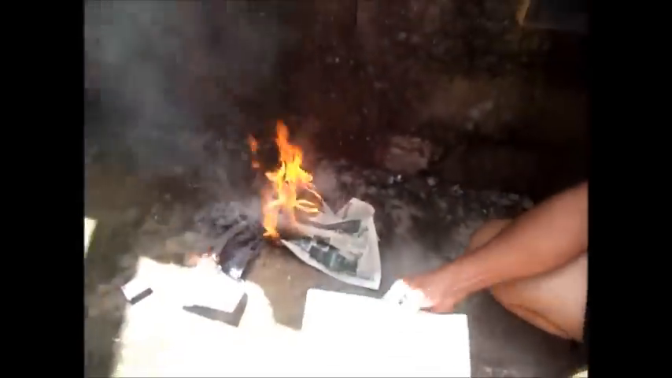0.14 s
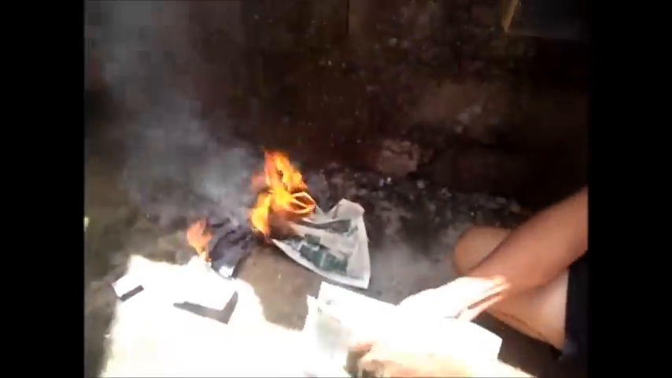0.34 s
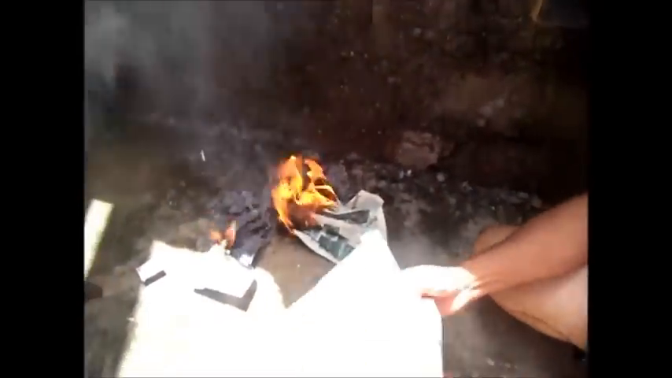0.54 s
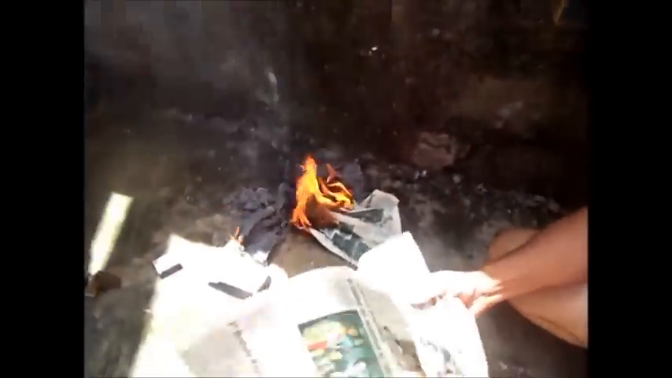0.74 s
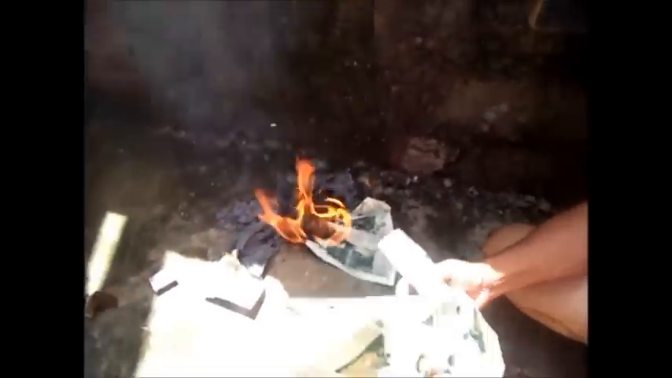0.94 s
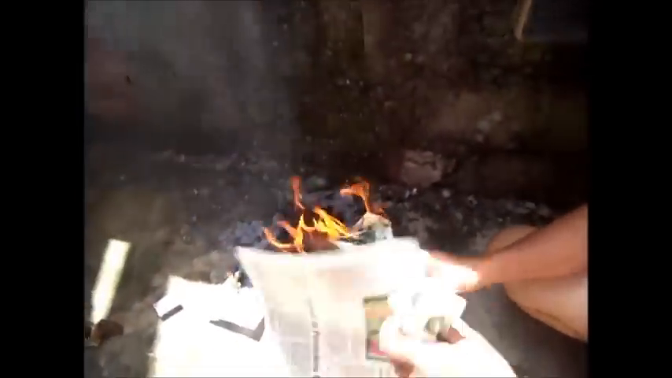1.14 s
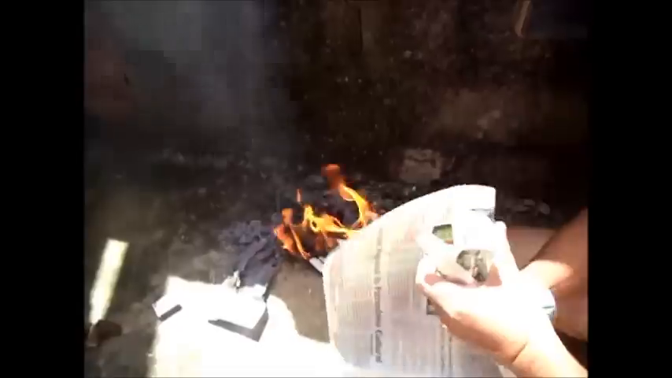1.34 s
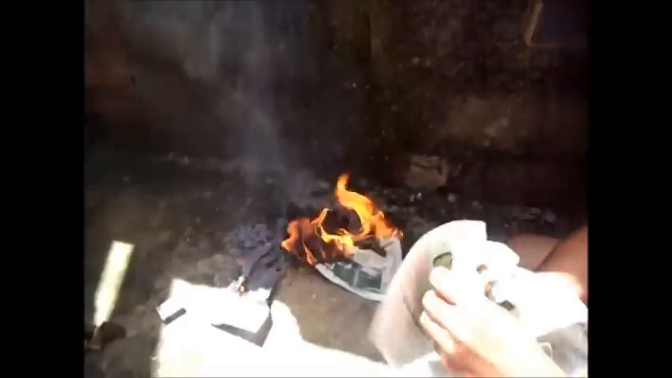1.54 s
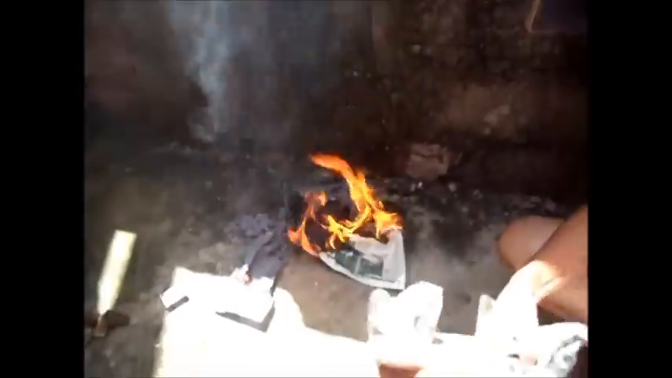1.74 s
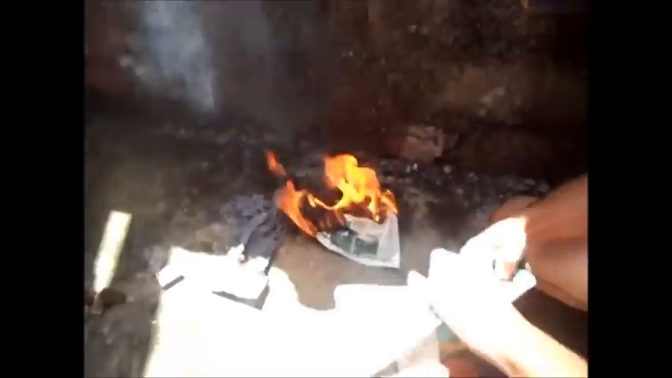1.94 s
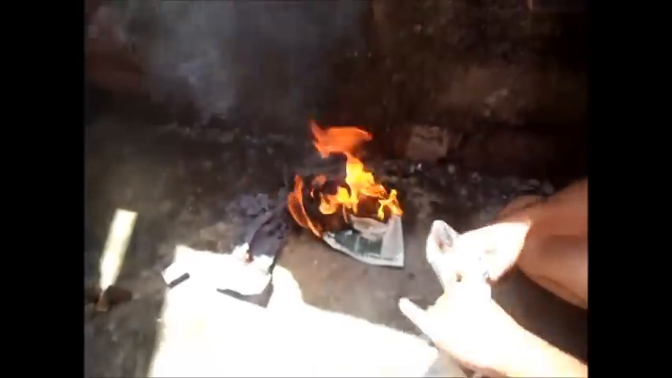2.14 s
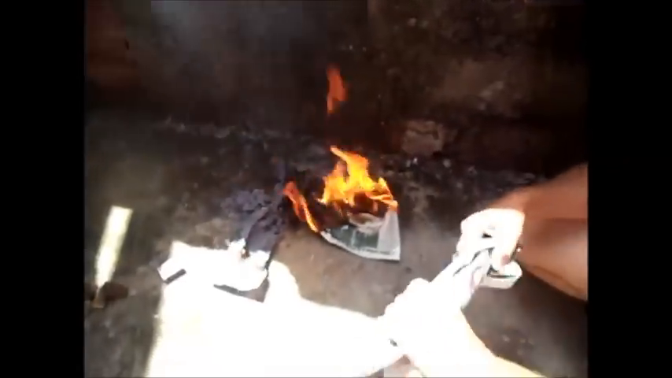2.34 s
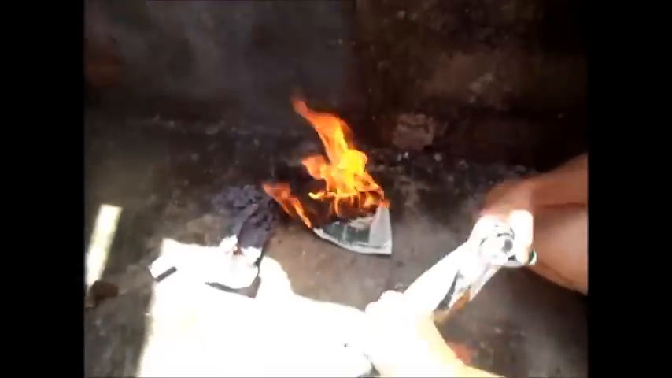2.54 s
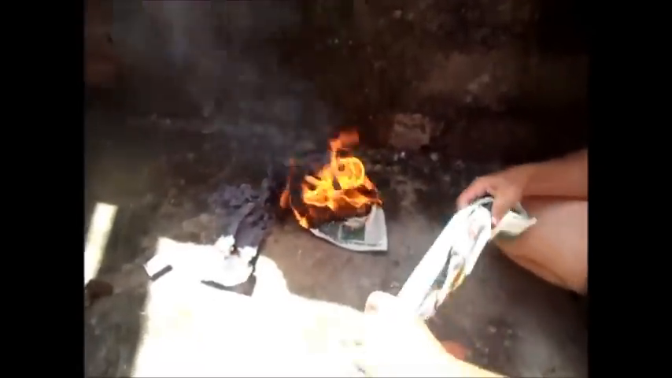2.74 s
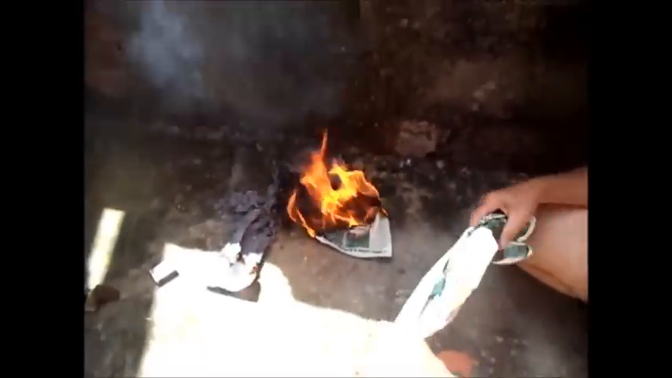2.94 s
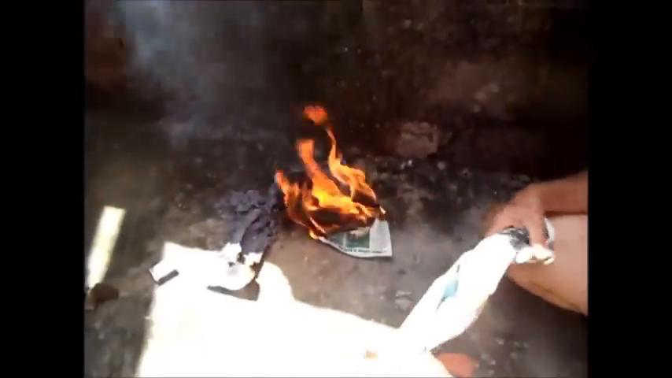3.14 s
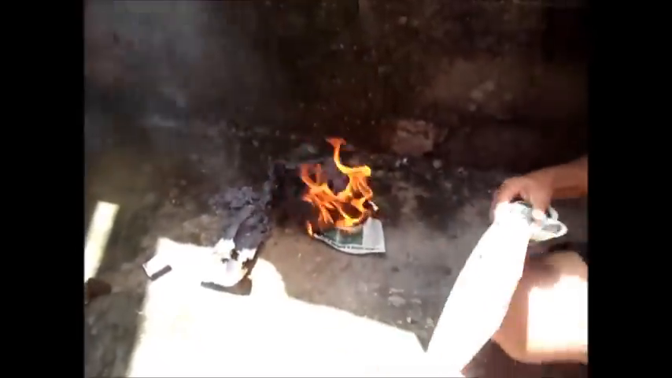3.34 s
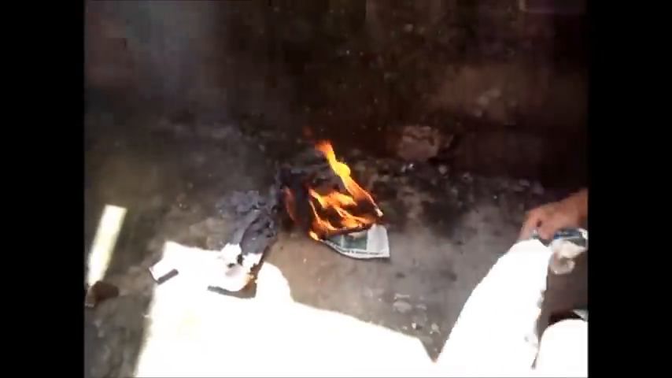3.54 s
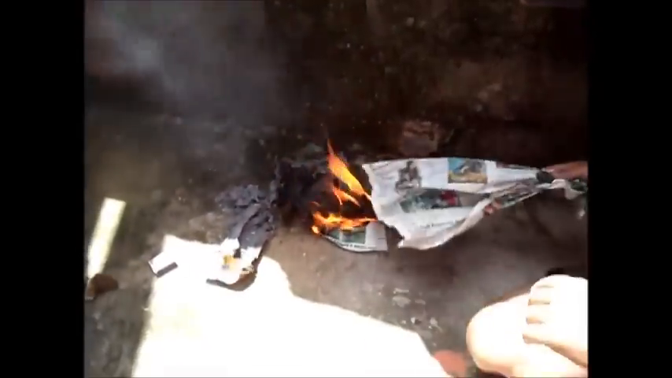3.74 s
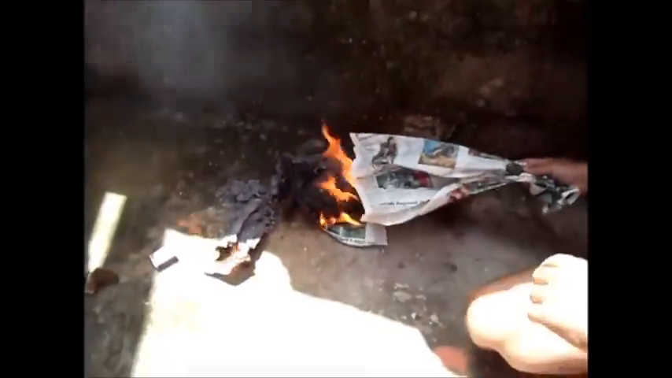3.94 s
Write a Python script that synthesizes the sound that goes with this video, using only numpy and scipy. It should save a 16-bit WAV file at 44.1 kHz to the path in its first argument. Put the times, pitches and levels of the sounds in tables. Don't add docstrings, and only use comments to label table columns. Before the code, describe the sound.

Close to a small camera outdoors, hands lift newspaper with sharp crackles, ball it with scrapes and soft thumps, then twist it in dense rustling that thins out, over faint hum, airy fire flutter and distant engine.

```python
import sys
import numpy as np
from scipy import signal
from scipy.fft import rfft, irfft, next_fast_len
from scipy.io import wavfile
from scipy.ndimage import uniform_filter1d, map_coordinates

SR = 44100
rng = np.random.default_rng(int(sys.argv[2]) if len(sys.argv) > 2 else 0)


def gain_from_decibels(decibels):
    exponent = np.asarray(decibels, float) / 20
    return 10 ** exponent


def waveform_to_disk(signal):
    frames = np.transpose(np.atleast_2d(signal))
    scaled = np.clip(frames, -1, 1) * 32767
    samples = np.round(scaled).astype(np.int16)
    wavfile.write(sys.argv[1], SR, samples)


N = 176400

# freq_hz, level_db_per_hz
AIR_SPECTRUM = [(18, -23), (35, -10), (106, -5.5), (300, -10), (800, -7.5), (1720, -12.5), (8590, -28),
                (11000, -39), (14300, -65)]
# freq_hz, level_db_per_hz
FLAME_SPECTRUM = [(85, -30), (118, -5), (130, 0), (145, -8), (200, -30)]
# freq_hz, level_db over background
HUM_PARTIALS = [(60, -6), (120, -3.5), (180, -8), (240, -4), (300, -15.5), (360, -8)]
# start_s, gain_db
GAIN_STEPS = [
    (.33, 2),
    (0.929, -4),
    (1.299, 3),
    (2.045, -12),
    (3.43, -3),
]
# time_s, pitch_hz, level_db
ENGINE_TRACK = [
    (0, 126, -56.5),
    (.3, 119, -63),
    (.5, 129, -61),
    (.9, 130, -55.5),
    (1.05, 132, -91),
    (1.4, 120, -77),
    (1.6, 119, -56.5),
    (2.2, 128, -66.5),
    (4, 122, -67),
]
# time_s, rustle_db
HAND_RUSTLE = [(0, -45), (.11, -48), (.2, -44.5), (.42, -45.5), (.47, -29.5), (.85, -43), (1.0, -36.5),
               (1.47, -38.5), (1.53, -47.5), (1.575, -39.5), (1.62, -39.5), (2.2, -34.5), (2.5, -31),
               (3.25, -32), (3.3, -34.5), (3.7, -37.5), (3.78, -49.5), (4, -55)]
# freq_hz, level_db_per_hz
PAPER_SPECTRUM = [(88, -21), (150, -19), (418, -17), (518, -6.5), (1080, -10), (1790, -2), (9880, 5),
                  (11000, 0.5), (14300, 10.5), (22000, -120)]
# start_s, peak_db, pitch_hz
PAPER_CREASES = [(0.0151, -20, 2200), (0.0623, -29, 1980), (0.1742, -31, 8710), (0.2932, -30, 5400),
                 (0.3283, -9, 6600), (0.3899, -19, 5940), (0.3965, -20, 5840), (0.4084, -27, 7590),
                 (0.4439, -27, 5540), (0.4809, -16, 6650), (0.5204, -13, 6590), (0.572, -23, 5520),
                 (0.6136, -17, 6490), (0.6367, -12, 8610), (0.6826, -8, 6670), (0.7021, -19, 6370),
                 (0.7403, -25, 5030), (0.7538, -24, 7180), (0.7797, -20, 7780), (0.8022, -17, 5860),
                 (0.8798, -20, 6510), (0.9002, -14, 7850), (0.911, -12, 6420), (0.9184, -14, 7140),
                 (0.9303, -5, 7520), (0.9425, -12, 9290), (0.9561, -20, 5680), (0.9699, -20, 6220),
                 (1.0156, -19, 4900), (1.0459, -23, 7540), (1.0561, -17, 6310), (1.0732, -18, 4790),
                (1.0854, -13, 7480), (1.1153, -21, 6740), (1.1267, -22, 6000), (1.1787, -19, 6150),
                (1.1842, -17, 8570), (1.1949, -14, 8170), (1.2238, -22, 4880), (1.2437, -24, 5100),
                (1.2843, -20, 7140), (1.2915, -15, 5870), (1.3055, -17, 6160), (1.3196, -11, 8050),
                (1.3467, -15, 6170), (1.4498, -14, 5660), (1.4878, -20, 3810), (1.5909, -13, 6920),
                (1.622, -9, 6240), (1.6348, -18, 7190), (1.6404, -17, 6600), (1.6602, -15, 4150),
                (1.6721, -16, 6840), (1.6785, -15, 7020), (1.6885, -13, 4670), (1.7061, -17, 2360),
                (1.7397, -12, 8320), (1.752, -16, 6150), (1.7634, -12, 6530), (1.7821, -12, 7260),
                (1.7969, -15, 6430), (1.8039, -14, 6570), (1.8281, -13, 6800), (1.8369, -16, 7220),
                (1.8515, -14, 5330), (1.8618, -14, 7930), (1.8765, -17, 5160), (1.9002, -17, 6780),
                 (2.0026, -23, 5490), (2.0169, -15, 7140), (2.0212, -16, 4870), (2.0424, -5, 5040),
                 (2.05, -18, 6640), (2.0997, -18, 6400), (2.1576, -18, 4790), (2.2375, -18, 8910),
                 (2.2541, -21, 7200), (2.2731, -22, 7340), (2.2815, -22, 7220), (2.2884, -20, 6600),
                 (2.3039, -19, 6830), (2.3544, -12, 7280), (2.3687, -19, 8150), (2.3792, -18, 6800),
                 (2.394, -13, 5990), (2.4044, -14, 6680), (2.411, -17, 6880), (2.4195, -19, 6410),
                 (2.4461, -21, 7730), (2.4685, -18, 5710), (2.4834, -16, 5930), (2.4895, -14, 8360),
                 (2.4975, -17, 5660), (2.5182, -9, 5970), (2.5317, -14, 5050), (2.5611, -11, 8450),
                 (2.5675, -14, 3370), (2.5821, -12, 5960), (2.6146, -17, 9000), (2.659, -22, 6620),
                 (2.7082, -20, 6960), (2.717, -21, 7460), (2.7261, -14, 8050), (2.7339, -18, 5200),
                 (2.7403, -18, 6460), (2.7682, -14, 6690), (2.7914, -16, 8490), (2.8106, -19, 7700),
                 (2.8258, -13, 9260), (2.8404, -15, 4300), (2.8601, -19, 7000), (2.8732, -13, 6390),
                 (2.9107, -16, 7150), (2.9338, -20, 7210), (2.9505, -19, 4020), (2.9921, -17, 8800),
                 (3.0181, -19, 7540), (3.0659, -19, 6890), (3.0962, -18, 5670), (3.1407, -15, 6610),
                 (3.1452, -15, 7170), (3.1555, -18, 8300), (3.1639, -13, 6230), (3.1924, -21, 6610),
                 (3.2318, -13, 8000), (3.243, -17, 5860), (3.2537, -14, 5680), (3.3534, -25, 5420),
                 (3.3652, -19, 6790), (3.3898, -25, 5190), (3.4216, -20, 7820), (3.4293, -13, 7000),
                 (3.4603, -27, 7820), (3.4783, -21, 6260), (3.5478, -13, 6190), (3.5708, -22, 7500),
                 (3.5932, -16, 6160), (3.5981, -22, 7830), (3.609, -26, 7060), (3.7122, -20, 6760),
                 (3.7547, -24, 8250), (3.7934, -35, 5030), (3.8059, -26, 4590), (3.9775, -29, 5800)]
# start_s, peak_db, pitch_hz
EMBER_TICKS = [
    (.1396, -32, 1840),
    (.152, -30, 6500),
    (3.827, -36, 5590),
    (3.8624, -36, 2640),
    (3.8768, -36, 5740),
    (3.9402, -40, 5800),
]
# start_s, level_db, pitch_hz
HAND_THUMPS = [
    (0.024, -37.5, 127),
    (0.685, -39, 300),
    (1.662, -33, 230),
    (1.731, -34, 197),
    (2.04, -31, 275),
]
# start_s, length_s, level_db, body_db relative to the hiss
SCRAPE_STROKES = [(0.184, 0.068, -33, -27), (0.241, 0.06, -34.5, -25), (0.316, 0.071, -29, 0),
                  (0.38, 0.04, -26.5, -16), (0.473, 0.026, -24, -6), (0.605, 0.033, -16.5, -11),
                  (0.621, 0.11, -35.5, 9.5), (0.746, 0.12, -37, -0.5), (0.874, 0.089, -30.5, 2.5),
                  (1.038, 0.16, -39, 6), (1.171, 0.07, -23, -14.5), (1.281, 0.046, -21, -24),
                  (1.448, 0.025, -13.5, -18), (1.577, 0.056, -19, -30), (1.614, 0.12, -24.5, -0.5),
                  (1.718, 0.18, -24, -3.5), (1.89, 0.07, -25.5, -16), (1.942, 0.078, -33.5, 3),
                  (2.011, 0.055, -34.5, 1.5), (2.048, 0.1, -36, 2.5), (2.235, 0.029, -28, -23),
                  (2.283, 0.158, -30, -6), (2.443, 0.18, -32.5, -36), (2.565, 0.082, -25.5, -10),
                  (2.718, 0.11, -32, -3), (2.816, 0.067, -30, -25), (2.889, 0.12, -36.5, -9),
                  (2.985, 0.12, -36.5, -30), (3.154, 0.017, -34, -15), (3.209, 0.072, -26.5, -29),
                  (3.631, 0.076, -20.5, -34)]
# freq_hz, level_db_per_hz
FLAP_SPECTRUM = [(100, -37), (250, -6), (600, -3), (1500, 0.5), (3000, -4)]

TIME_S = np.arange(N) / SR
TOP_HZ, TOP_SLOPE_HZ = 10758, 184


def unit(x):
    return x / np.sqrt(np.mean(x ** 2, axis=-1, keepdims=True) + 1e-20)


def along(spectrum, hz):
    point_hz, point_db = np.transpose(spectrum)
    return gain_from_decibels(np.interp(np.log(hz + 1), np.log(point_hz + 1), point_db))


def wobble(rate_hz):
    return map_coordinates(rng.standard_normal(2000), [np.arange(N) * rate_hz / SR])


def filtered(x, response):
    size = next_fast_len(N + SR // 4)
    return irfft(rfft(x, size) * response(np.fft.rfftfreq(size, 1 / SR)), size)[:N]


def noise(spectrum):
    return unit(filtered(rng.standard_normal(N), lambda hz: along(spectrum, hz)))


def mains_hum():
    growth_db_per_s = 2.2
    hum = np.zeros(N)
    for hz, db in HUM_PARTIALS:
        level = gain_from_decibels(db + growth_db_per_s * (TIME_S - 3.5) + 0.6 * wobble(5.5))
        phase = 2 * np.pi * hz * TIME_S + .5 * wobble(2.62)
        hum += level * np.sin(phase)
    return hum


def flames():
    level_db, fade_db_per_s = -9, -2.5
    return gain_from_decibels(level_db + fade_db_per_s * TIME_S + 1.2 * wobble(7.7)) * noise(FLAME_SPECTRUM)


def air():
    level_db, flutter_db = 5, 1.4
    return gain_from_decibels(level_db + flutter_db * wobble(15)) * noise(AIR_SPECTRUM)


def yard():
    background_db, recover_s = -58.5, 0.28
    gain_db = np.full(N, background_db)
    for s, db in GAIN_STEPS:
        gain_db = gain_db + db * (TIME_S > s) * np.exp(-abs(TIME_S - s) / recover_s)
    return gain_from_decibels(gain_db) * (mains_hum() + flames() + air())


def engine():
    s, hz, db = np.transpose(ENGINE_TRACK)
    level = gain_from_decibels(np.interp(TIME_S, s, db) + 1.9 * wobble(14))
    pitch_hz = np.interp(TIME_S, s, hz) + 4.41 * wobble(9)
    return level * np.sin(2 * np.pi * np.cumsum(pitch_hz) / SR)


def patchy(x):
    patch_db = 4
    z = signal.stft(x, nperseg=256)[2]
    field = uniform_filter1d(rng.standard_normal(z.shape), size=9, axis=0)
    field = uniform_filter1d(field, size=4, axis=1)
    return unit(signal.istft(z * gain_from_decibels(patch_db * field / field.std()), nperseg=256)[1][:N])


def rubbing(drive):
    return gain_from_decibels(-7.5) * drive * patchy(noise(PAPER_SPECTRUM))


def snaps(s, peak_db, hz, longer, spike, size):
    colour_db, colour_oct = 4.5, 0.48
    roll_db_per_oct, roll_from_oct = -16, .4
    mottle_db = 3
    f = np.fft.rfftfreq(size, 1 / SR)
    octaves = np.log2((f + 1) / hz[:, None])
    bump_db = colour_db * np.exp(-.5 * (octaves / colour_oct) ** 2)
    colour = gain_from_decibels(bump_db + roll_db_per_oct * (octaves - roll_from_oct).clip(0))
    mottle = unit(uniform_filter1d(rng.standard_normal(colour.shape), size=size // 40, axis=1))
    colour = colour * gain_from_decibels(mottle_db * mottle)

    lead_db, lead_s = -9, .006
    t60_s, tail_db, tail_t60_s = .01, -17, .03
    t = (np.arange(size) - size // 4) / SR
    creak = gain_from_decibels(lead_db + 60 * t / lead_s)
    rattle = gain_from_decibels(-60 * t / (t60_s * longer[:, None])) + gain_from_decibels(tail_db - 60 * t / tail_t60_s)
    shock = rng.standard_normal((len(s), size)) * np.where(t < 0, creak, rattle)
    shock = shock - spike * (t == 0)

    burst = irfft(rfft(shock) * colour * along(PAPER_SPECTRUM, f) * (f < TOP_HZ), size)
    burst *= (gain_from_decibels(peak_db) / np.abs(burst).max(axis=1))[:, None]
    at = np.round(s * SR).astype(int)[:, None] + np.arange(size)
    return np.bincount(at.ravel(), burst.ravel(), N + SR)[size // 4:][:N]


def crinkles(drive, count=2600):
    level_db, spread_db, centre_hz = -5, 4, 6500
    u = rng.random((count, 4))
    s = u[:, 0] * (N - 1) / SR
    drive_db = 20 * np.log10(drive[(s * SR).astype(int)])
    peak_db = drive_db + level_db - spread_db * (np.log(1 - 0.94 * u[:, 1]) + 1)
    hz = centre_hz * np.exp(1.9 * (u[:, 2] - .5))
    return snaps(s, peak_db, hz, .4 + 1.2 * u[:, 3] ** 2, spike=1.6, size=512)


def creases():
    quicker_per_db = .03
    events = PAPER_CREASES + EMBER_TICKS
    s, db, hz = np.transpose(events)
    longer = np.exp(.25 * rng.standard_normal(len(s)) - quicker_per_db * (db - db.mean()))
    return snaps(s, db - 1.7, hz, longer, spike=2.8, size=1024)


def thumps():
    decay_cycles = 5.4
    out, t = np.zeros(N + SR), np.arange(SR // 8) / SR
    for s, db, hz in HAND_THUMPS:
        push = gain_from_decibels(db - 60 * t * hz / decay_cycles) * np.sin(2 * np.pi * hz * t)
        out[round(s * SR):][:len(t)] += push
    return out[:N]


def strokes():
    rise_s, fall_s = 0.0049, 0.037
    hiss, body = np.zeros(N), np.zeros(N)
    for s, length, db, body_db in SCRAPE_STROKES:
        ramp = np.minimum((TIME_S - s) / rise_s, (s + length - TIME_S) / fall_s)
        shape = np.clip(ramp, 0, 1) ** 2
        hiss += gain_from_decibels(db) * shape
        body += gain_from_decibels(db + body_db) * shape
    return hiss, body


def flapping(gain):
    return gain_from_decibels(-7) * gain * noise(FLAP_SPECTRUM)


def paper():
    rustle_db = 2.5
    big = creases()
    s, db = np.transpose(HAND_RUSTLE)
    rustle = gain_from_decibels(np.interp(TIME_S, s, db) + rustle_db)
    hiss, body = strokes()
    clumps = gain_from_decibels(1.58 * wobble(110) + 1.46 * wobble(300))
    drive = clumps * (hiss + rustle)
    return big + crinkles(drive) + rubbing(drive) + flapping(clumps * body)


def scene():
    return (paper() + thumps() + yard() + engine())[None]


def band_limit(hz):
    return 1 / (1 + np.exp(np.clip((hz - TOP_HZ) / TOP_SLOPE_HZ, -50, 50)))


def roll_off(x):
    return signal.sosfilt(signal.butter(12, 11850, fs=SR, output="sos"), x)


def record(dry):
    mix = filtered(dry[0], band_limit)[None]
    return roll_off(mix)


dry = scene()
out = record(dry)
waveform_to_disk(out)
```